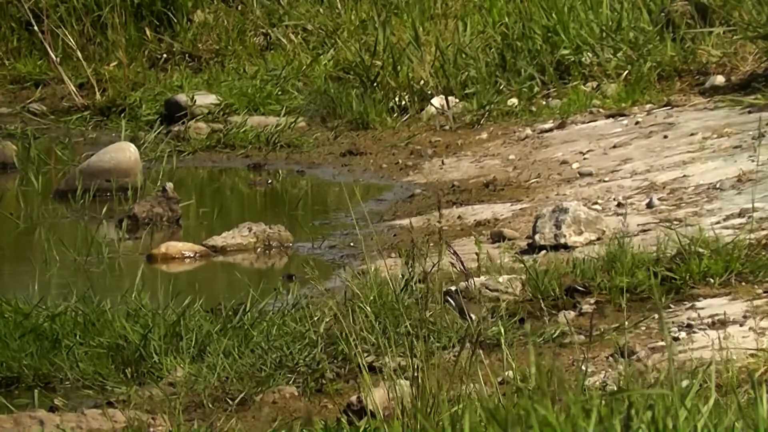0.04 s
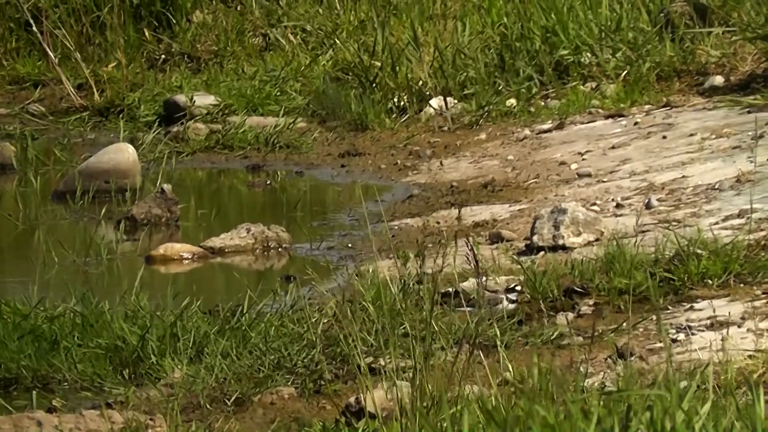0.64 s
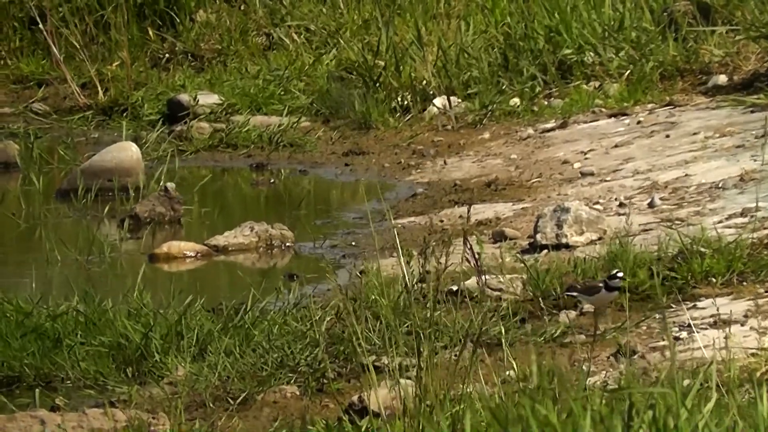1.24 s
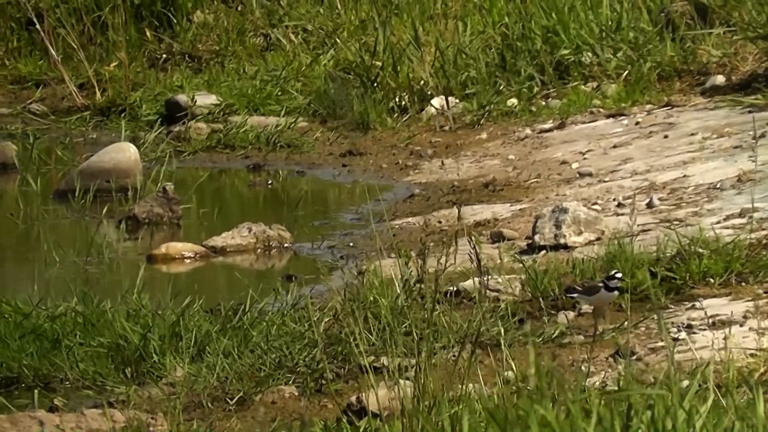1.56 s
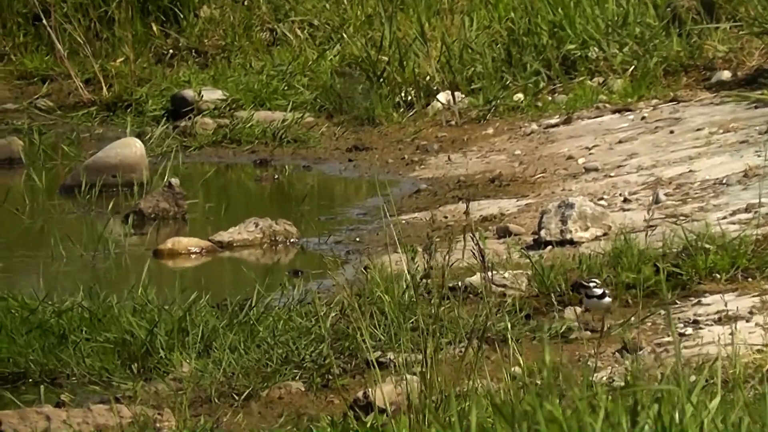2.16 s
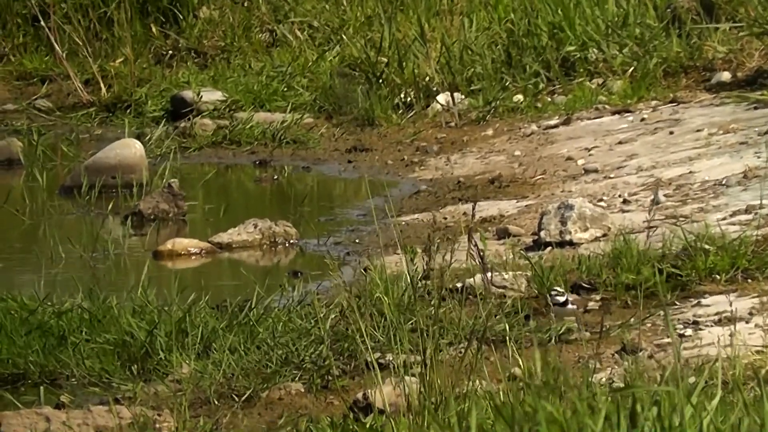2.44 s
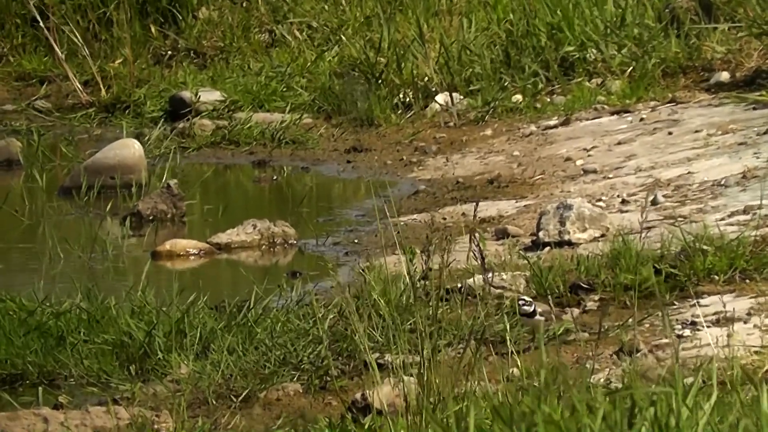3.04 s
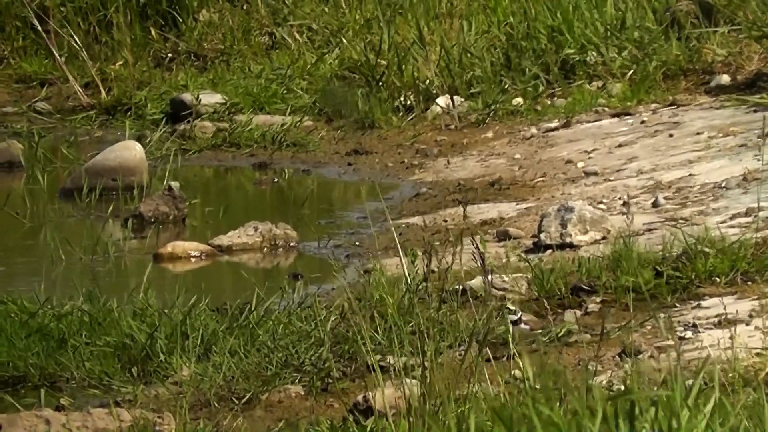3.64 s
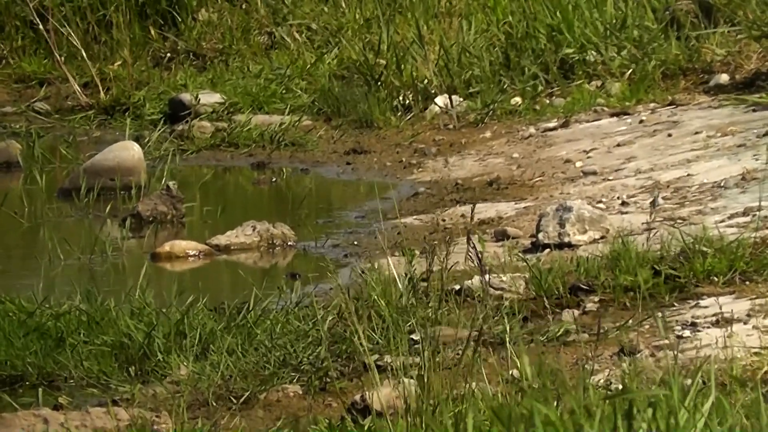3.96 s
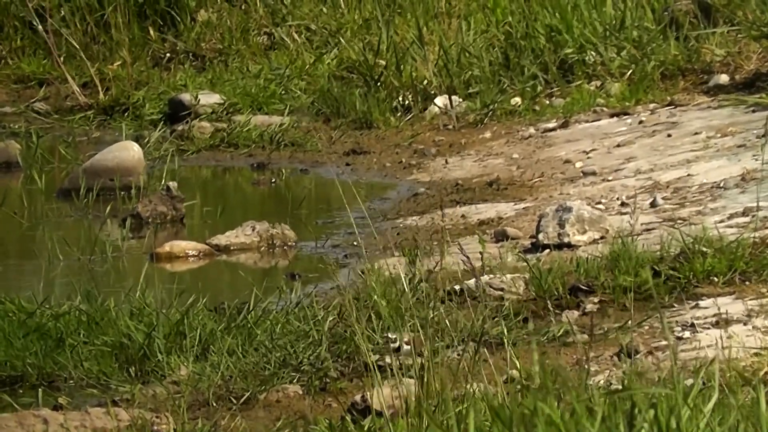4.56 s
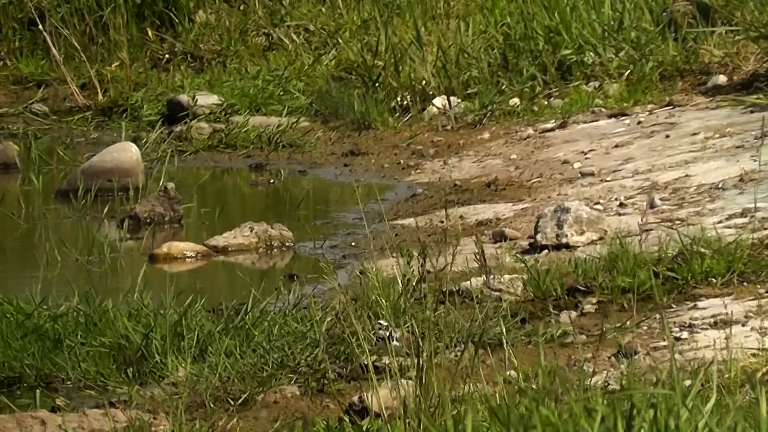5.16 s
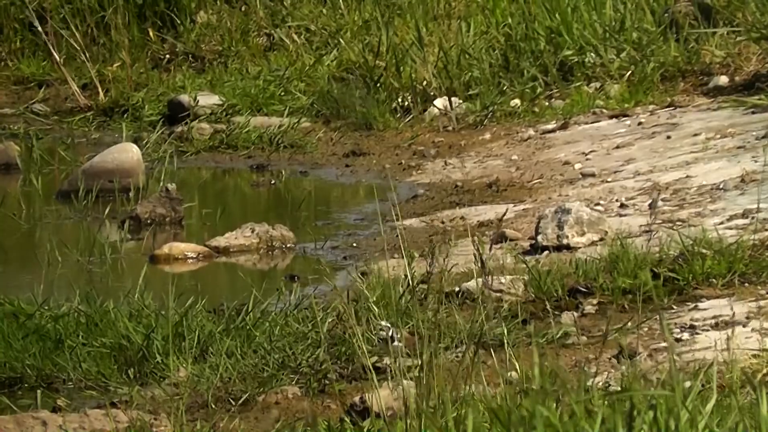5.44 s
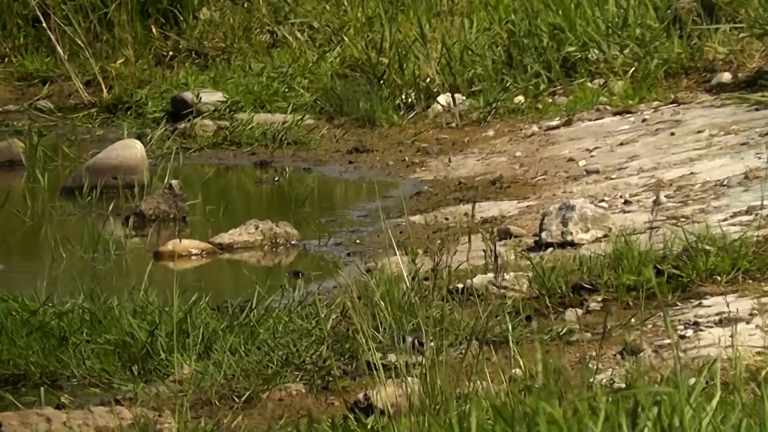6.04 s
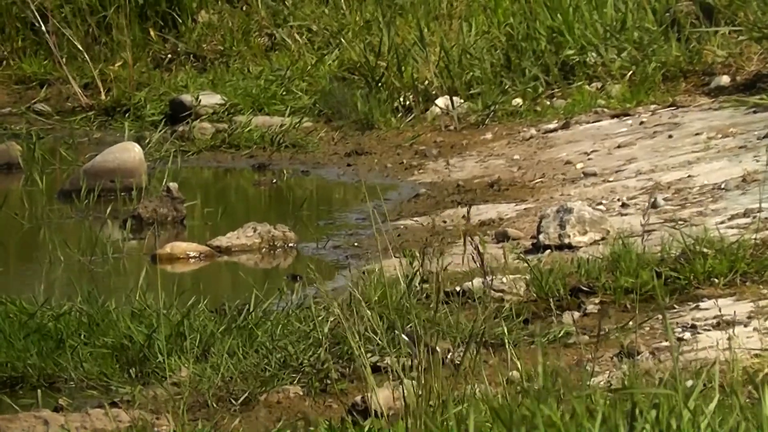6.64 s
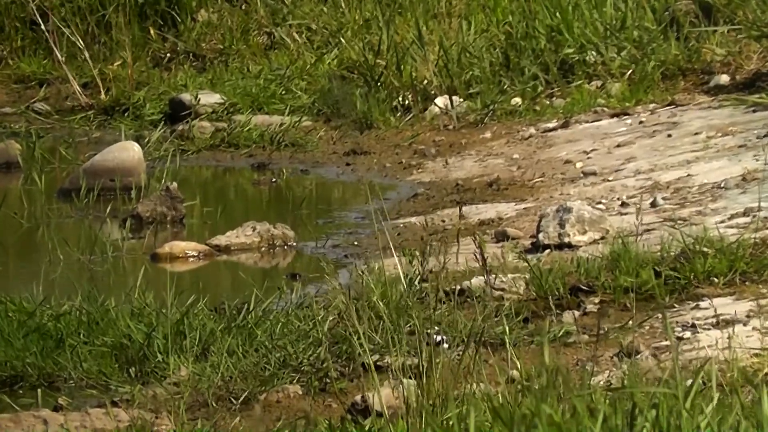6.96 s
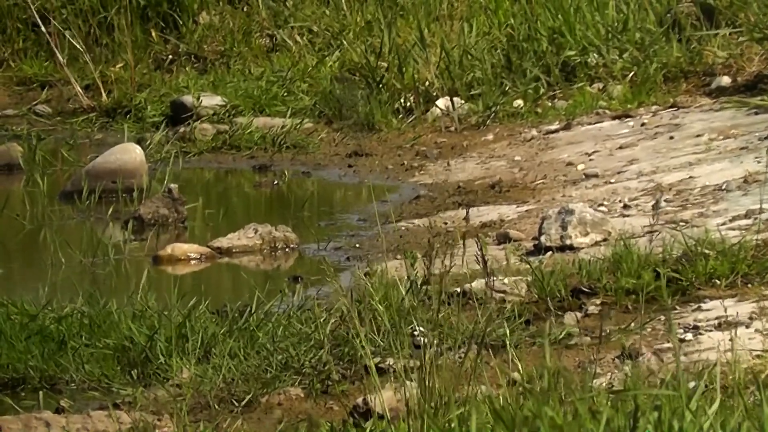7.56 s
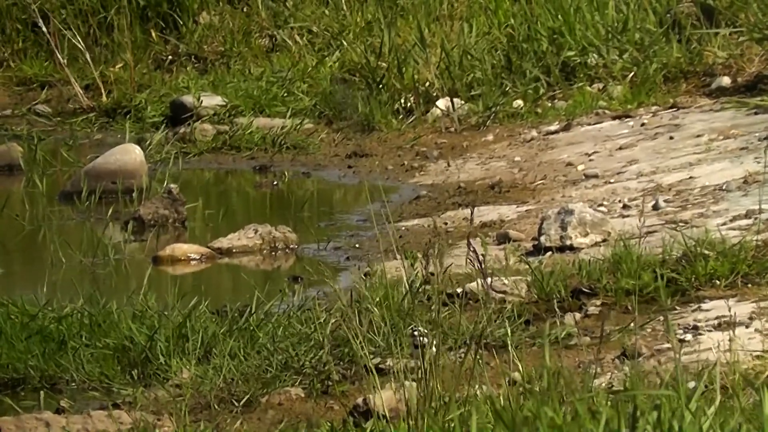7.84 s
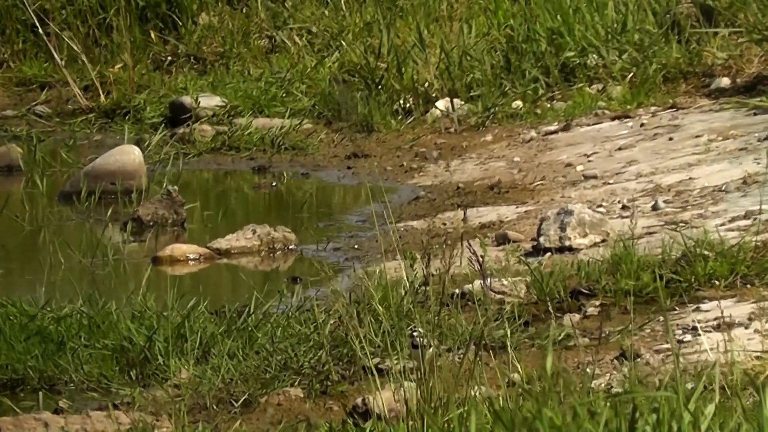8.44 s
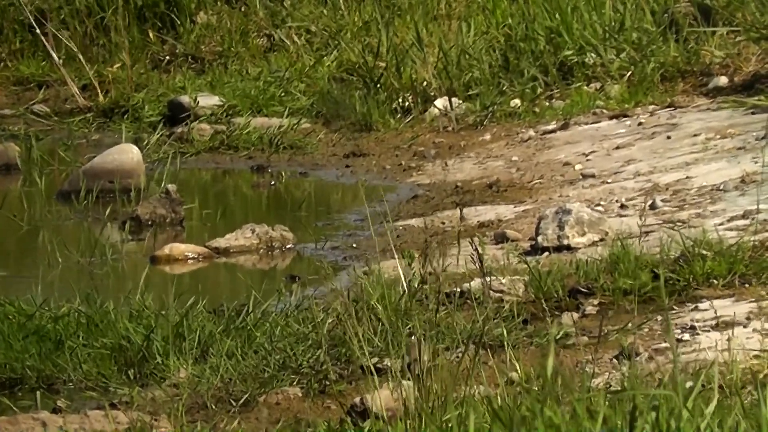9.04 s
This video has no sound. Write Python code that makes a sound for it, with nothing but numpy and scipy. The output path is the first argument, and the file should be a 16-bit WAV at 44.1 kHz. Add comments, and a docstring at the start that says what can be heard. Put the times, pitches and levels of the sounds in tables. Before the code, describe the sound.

Small birds zip, trill and whistle outdoors, with faint crickets behind them and uneven gusts of wind rumbling on the microphone.

```python
"""Small birds whistle, zip, trill and twitter in the grass round a pool, a little right of the camera,
each note a gliding tone. Two field crickets, one close and one farther back, chirp with quick wing
strokes in front of a distant chorus. Wind eddies buffet the camera's stereo microphone with low
thumps, over a soft outdoor hiss and the faint whine of the camera itself."""
import sys
import numpy as np
from scipy import signal
from scipy.fft import rfft, irfft
from scipy.io import wavfile
from scipy.ndimage import uniform_filter1d

SR = 44100
rng = np.random.default_rng(int(sys.argv[2]) if len(sys.argv) > 2 else 0)


def output_pcm(signal):
    """Save a mono or channel-first signal as 16-bit PCM at the path in sys.argv[1].

    Samples are clipped to [-1, 1] before scaling.
    """
    pcm = np.clip(np.atleast_2d(signal).T, -1, 1) * 32767
    wavfile.write(sys.argv[1], SR, np.round(pcm).astype(np.int16))


N = 410571
T = np.arange(N) / SR
FREQ = np.maximum(np.arange(N // 2 + 1) * SR / N, 1)

# light breeze between gusts: (time [s], level [dB])
BREEZE = [(0, -61), (.38, -57), (.5, -45), (2.0, -45.5), (2.85, -55.5), (3.3, -50), (4.4, -56.5),
          (5.4, -53.5), (5.75, -62.5), (6.3, -56.5), (7.0, -63), (7.5, -60.5), (8.65, -63), (9.3, -53.5)]
# gusts on the microphone: (start [s], hold [s], level [dB])
GUSTS = [(0.47, 0.087, -36.5), (0.598, 0.06, -41.5), (0.684, 0.129, -33), (0.823, 0.075, -38),
         (0.944, 0.11, -34.5), (1.09, 0.057, -33), (1.164, 0.213, -35.5), (1.472, 0.047, -35.5),
         (1.575, 0.5, -42.5), (1.639, 0.011, -35), (1.772, 0.2415, -36.5), (2.148, 0.097, -42.5),
         (2.329, 0.087, -39), (2.506, .14, -45), (3.012, 0.037, -38.5), (3.105, 0.049, -36.5),
         (3.18, 0.084, -43), (3.316, 0.011, -38.5), (3.573, 0.054, -39.5), (3.626, 0.29, -49.5),
         (4.031, 0.063, -39), (4.203, 0.029, -38), (4.429, 0.026, -42), (4.762, 0.024, -39.5),
         (4.841, 0.023, -41.5), (5.034, 0.0041, -40.5), (5.164, 0.0073, -43), (5.968, 0.08, -52.5),
         (6.183, 0.0083, -40), (6.563, 0.032, -46), (6.634, 0.037, -41), (7.096, 0.02, -48.5),
         (7.189, 0.403, -45.5), (7.378, 0.0078, -38.5), (8.797, .12, -51.5), (8.953, 0.35, -44.5),
         (9.125, 0.011, -40.5)]
# single eddies hitting head-on: (time [s], level [dB], half width [s])
BUFFETS = [(.524, -22.5, 0.001), (.674, -30, 0.00061), (1.015, -34, 0.00051), (1.259, -30.5, 0.00058),
           (1.640, -34, 0.00069), (3.010, -34.5, 0.00076), (.956, -26, 0.00066), (1.344, -28.5, 0.00066),
           (1.779, -29.5, 0.00057), (1.850, -32, 0.00038), (3.328, -29.5, 0.0014), (3.576, -24, 0.0011),
           (4.221, -31, 0.0011), (5.041, -38, 0.00092), (6.66, -35.5, 0.0016)]
# spectra of the wind and the outdoor hiss: (frequency [Hz], relative level [dB])
WIND_SPECTRUM = [(25, -21.5), (60, 0), (110, 7.5), (200, 2), (330, -11), (500, -26.5), (800, -42.5),
                 (1300, -59.5), (9000, -125)]
HISS_SPECTRUM = [(120, -23), (300, 3), (550, 0), (850, 2.5), (1100, -2), (1500, -8.5), (2200, -12.5),
                 (2800, -16.5), (3700, -15.5), (4700, -14.5), (6500, -17), (9000, -22.5), (15000, -29)]
# the camera's steady whines: (frequency [Hz], width [Hz], level [dB])
WHINES = [(1790, 58, -85), (2175, 110, -92), (7930, 35, -105)]
# spells of its thin high whine: (start [s], end [s])
THIN_WHINE_SPELLS = [(1.40, 2.954), (7.05, 8.60)]
# chirps of the close cricket: (last wing stroke [s], level [dB])
NEAR_CHIRPS = [(0.048, -67.5), (0.298, -68), (0.587, -67), (0.88, -68.5), (1.095, -69.5), (1.353, -71.5),
               (1.55, -71), (1.846, -71.5), (2.015, -71), (2.24, -66.5), (2.479, -62), (3.31, -65),
               (3.565, -72.5), (4.097, -65.5), (4.476, -69.5), (4.916, -68), (5.305, -68), (5.571, -64),
               (5.906, -64.5), (6.153, -67), (6.442, -64), (6.93, -67.5), (7.104, -66.5), (7.426, -70.5),
               (8.035, -66), (8.894, -71.5), (9.213, -74)]
# chirps of the farther cricket: (last wing stroke [s])
FAR_CHIRP_TIMES = [.14, .35, .925, 1.36, 1.61, 1.80, 2.19, 2.395, 2.60, 2.845, 3.01, 3.225, 3.445, 3.66,
                   3.81, 4.13, 4.34, 4.87, 5.06, 5.28, 5.52, 5.75, 5.96, 6.21, 6.65, 6.96, 7.46, 7.675,
                   7.89, 8.14, 8.365, 8.55, 8.78, 8.99, 9.18]
# notes of each bird figure:
# (delay [s], length [s], start pitch [Hz], middle pitch [Hz], end pitch [Hz], relative level [dB])
TICK_NOTES = [(-.014, 0.01, 5600, 6000, 5500, -22), (-.004, 0.0055, 4600, 5150, 5730, -10.5),
              (.001, 0.0047, 4900, 4360, 3900, -10)]
TWITTER_NOTES = [(.0168 * k, .008, 2700 + 130 * k, 2950 + 130 * k, 3250 + 130 * k, 0) for k in range(4)]
ZIP_NOTES = [(-.069, 0.0051, 3300, 4460, 4900, -9), (-.060, 0.0085, 3250, 3840, 4430, -13),
             (-.040, 0.0037, 2600, 2830, 2820, -14.5), (-.030, 0.0034, 2700, 2940, 3050, -16.5),
             (-.020, 0.0054, 3200, 3770, 4300, -12.5)]
TRILL_NOTES = [(-.004, 0.0088, 2570, 2730, 2600, 0.1),
               (.008, 0.01, 2440, 2630, 2550, 1)] + [(.046 + .0317 * k, .016, 1950, 2290, 2060, -2.5) for k in range(5)] + [(0.026 + 0.035 * k, .010, 2850, 3050, 3200, -9) for k in range(5)]
CHIT_NOTES = [(-.006, 0.0098, 2590, 4260, 2860, 1), (.005, 0.0032, 3000, 2950, 2900, 0.5),
              (.010, .007, 3600, 2800, 2200, -7)]
TSIT_NOTES = [(-.005, 0.0079, 2820, 4440, 5600, 2), (.020, 0.012, 5740, 6020, 5700, -4.5),
              (.030, .005, 5700, 4300, 3000, 1)]
# when each figure is sung: (time [s], level [dB])
TICKS = [(0.021, -55), (0.211, -56), (2.945, -59)]
ZIPS = [(4.111, -49.5), (4.545, -47), (4.743, -50.5), (5.188, -49), (5.389, -56.5)]
TRILLS = [(4.247, -65), (4.877, -68)]
CHITS = [(5.518, -64.5), (5.59, -71), (5.662, -72), (5.734, -70), (5.806, -67.5), (5.876, -66.5),
         (5.95, -66)]
TSITS = [(6.032, -63), (6.112, -67)]
# deep arched calls round a phrase: (top time [s], rise [s], top pitch [Hz], depth [Hz], level [dB])
DEEP_ARCHES = [(0.136, 0.034, 3820, 856, -64.5), (0.328, 0.04, 3760, 880, -64),
               (1.569, .05, 4290, 868, -65.5)]
# the run of shallow arches between them: (level [dB])
RUN_LEVELS = [-68.5, -70, -70, -70, -70, -72, -69, -75]
# distant whistles:
# (turn [s], lead [s], tail [s], start pitch [Hz], turn pitch [Hz], end pitch [Hz], level [dB])
WHISTLES = [(.377, .11, .15, 2035, 2250, 1900, -72), (.447, .03, .03, 3230, 2990, 2900, -73),
            (.671, .035, .09, 2460, 2305, 2230, -73), (1.54, .025, .025, 2200, 2220, 2200, -73),
            (1.70, .035, .09, 1970, 2100, 2010, -70), (1.95, .30, .2, 2950, 3280, 3200, -84),
            (2.16, .045, .04, 2900, 3400, 3200, -80), (3.28, .09, .18, 2150, 2100, 1980, -80),
            (3.47, .09, .13, 2780, 2840, 2480, -80), (4.66, .02, .04, 2450, 2500, 2200, -74),
            (6.29, .085, .36, 2380, 4280, 3560, -78.5), (6.30, .09, .32, 1700, 2860, 2520, -82),
            (6.50, .04, .11, 5170, 5130, 4800, -83), (6.70, .065, .03, 4050, 3420, 3370, -79),
            (6.787, .09, .025, 4540, 5100, 5000, -79), (6.875, .025, .04, 2520, 2590, 2760, -76),
            (6.93, .03, .06, 2700, 2810, 2720, -85), (6.94, .10, .025, 4700, 5150, 4940, -77),
            (7.097, .10, .015, 4730, 5200, 4950, -73), (7.155, .045, .035, 3380, 3080, 3130, -77),
            (7.46, .03, .03, 3260, 3060, 3230, -81), (7.98, .07, .08, 1270, 1255, 1225, -78),
            (8.615, .015, .009, 5550, 5680, 5550, -75), (8.708, .013, .008, 5450, 5690, 5550, -76)]
# bird buzzes:
# (start [s], end [s], centre [Hz], glide [Hz], pulse half sweep [Hz], pulse rate [1/s], level [dB])
BUZZES = [(2.431, 3.06, 4310, 102, 447, 77, -75), (3.215, 3.287, 4200, -200, 1000, 95, -74),
          (5.41, 5.48, 5500, -500, 500, 165, -81), (7.142, 7.17, 3940, -800, 700, 190, -73),
          (7.181, 7.289, 4900, 300, 500, 220, -74.5), (7.365, 7.383, 5250, -150, 400, 155, -74),
          (8.968, 9.05, 3080, 50, 150, 110, -80), (9.124, 9.166, 5170, -700, 500, 200, -80)]
# course of a bird's falling rattle: (time [s], centre [Hz], pulse length [s], level [dB])
RATTLE = [(3.659, 3500, 0.0093, -67), (3.686, 2750, 0.012, -71), (3.73, 2800, 0.0084, -68),
          (3.80, 3010, 0.0043, -66), (3.982, 2360, .005, -74)]


def undb(db):
    """Decibels to gain."""
    return 10 ** (np.asarray(db) / 20)


def unit(x):
    """Scale to rms 1."""
    return x / np.sqrt(np.mean(x ** 2))


def noise(gain):
    """Noise of rms 1 with the given gain at each frequency."""
    return unit(irfft(rfft(rng.standard_normal(N)) * gain, N))


def colour(points):
    """Gain at each frequency from (frequency [Hz], level [dB]) points."""
    hz, db = np.transpose(points)
    return undb(np.interp(np.log(FREQ), np.log(hz), db))


def walk(rate_hz):
    """Smooth random wandering with a spread of 1."""
    return noise(np.exp(-(FREQ / rate_hz) ** 2))


def pan(x, left_db):
    """Place a sound by its left minus right level."""
    return x * undb(np.array([[left_db], [-left_db]]) / 2)


def add(track, start, sound):
    """Mix a sound into a track at a time in seconds."""
    i = np.arange(len(sound)) + int(start * SR)
    inside = (i >= 0) & (i < N)
    track[i[inside]] += sound[inside]


def wind_strength(attack_s=.0071, release_s=.013, sway_db=3.5):
    """Wind level in dB: each gust rises fast, holds and dies away over a swaying breeze."""
    power = undb(np.interp(T, *np.transpose(BREEZE)) + sway_db * walk(17.7)) ** 2
    for start, hold, db in GUSTS:
        t = np.arange(-.05, hold + .2, 1 / SR)
        envelope = np.exp(np.minimum(t, 0) / attack_s - np.maximum(t - hold, 0) / release_s)
        add(power, start - .05, (undb(db) * envelope) ** 2)
    return 10 * np.log10(power)


def churn(gain, turnover_s=.055):
    """Turbulence: noise whose strength stays even over longer than an eddy's turnover."""
    x = noise(gain)
    return x / np.sqrt(uniform_filter1d(x ** 2, int(turnover_s * SR)) + 1e-9)


def wind(small_eddy_hz=380, crackle_db=2):
    """Eddies thump the microphone; harder gusts shed smaller ones that push its ports in opposition."""
    gust_db = wind_strength()
    hardness_db = gust_db + 38
    edge_fade = np.minimum(np.minimum(T, T[::-1]) / .01, 1)
    gust = edge_fade * undb(gust_db - 2 + 1.2 * walk(30))
    spectrum = colour(WIND_SPECTRUM)
    small_share = FREQ ** 2 / (FREQ ** 2 + small_eddy_hz ** 2)
    large, small = spectrum * (1 - small_share), spectrum * small_share
    large_gain = undb(-np.maximum(hardness_db, 0))
    small_gain = undb(.92 * hardness_db - 4 + crackle_db * walk(76))
    shared, left, right = (gust * (large_gain * churn(large) + small_gain * churn(small))
                           for _ in range(3))
    # an eddy hitting head-on is one short swing of pressure
    for middle, db, width in BUFFETS:
        u = np.arange(-10, 10, 1 / (width * SR))
        add(shared, middle - 10 * width, undb(db) * (1 - u ** 2) * np.exp(-u ** 2 / 2))
    phase_gap = np.interp(FREQ, [30, 110, 380, 700], [.4, .8, 2.1, 2.65])
    left_db = np.interp(FREQ, [110, 380, 900], [1.7, -5.5, -2])
    ports = undb(np.array([left_db, -left_db]) / 2) * np.exp(.5j * np.array([phase_gap, -phase_gap]))
    ports /= np.abs(ports.mean(axis=0))
    return irfft(rfft(shared) * ports, N) + undb(-8) * np.array([left, right])


def outdoor_hiss(db=-72.5):
    """Steady distant hiss, wide in the middle range and narrower in the treble."""
    spectrum = unit(colour(HISS_SPECTRUM))
    width = colour([(100, -10), (400, -8.5), (1300, -.5), (2400, -1.5),
                    (4400, -18.5), (8000, -9), (15000, -2.5)])
    mid, side = (irfft(rfft(rng.standard_normal(N)) * spectrum * w, N) for w in (1, width))
    return np.array([mid + side, mid - side]) * undb(db)


def whine(hz, width_hz):
    """Noise through a steep resonance."""
    return noise(1 / (1 + ((FREQ - hz) / (width_hz * .75)) ** 2))


def camera_whine(tone_hz=12500):
    """The camera whines faintly; a thin high band switches on twice with a soft whirr under it."""
    steady = sum(undb(db) * whine(hz, width) for hz, width, db in WHINES)
    tone = undb(-102.5) * np.sin(2 * np.pi * tone_hz * T)
    gate = sum((T > start) & (T < end) for start, end in THIN_WHINE_SPELLS)
    thin = undb(-94) * np.array([whine(11650, 380) for _ in range(2)])
    whirr = undb(-88) * whine(2230, 260)
    return steady + tone + gate * (thin + whirr)


def wing_stroke(length, hz, sag):
    """One stroke rises onto the pitch of the wing's harp, swells, then sags as the wing slows."""
    u = np.linspace(0, 1, int(length * SR))
    pitch = hz * (1 - sag * (u ** 5 + .6 * (1 - u) ** 3))
    swell = np.sin(np.pi * u ** 1.1) ** .85
    return swell * np.sin(2 * np.pi * np.cumsum(pitch) / SR)


def cricket(chirps, hz, stroke_s, gap_s, fade_db, sag=.1):
    """The four wing strokes of a chirp grow longer, higher and louder, each a little different."""
    out = np.zeros(N)
    for last, db in chirps:
        for k in range(4):  # counted back from the last stroke
            sharp, long, loud = rng.standard_normal(3)
            length = stroke_s * (1 - .1 * k + .1 * long)
            stroke = wing_stroke(length, hz * (1 - .012 * k + .005 * sharp), sag)
            gain = undb(db + fade_db * k ** 2 + (1 + k / 2) * loud)
            add(out, last - gap_s * k - len(stroke) / SR / 2, gain * stroke)
    return out


def cricket_chorus(db, count, centre_hz=4850, spread_hz=90):
    """More crickets far off in the meadow, each at its own pitch and pace."""
    out = 0
    for hz in centre_hz + spread_hz * np.linspace(-1, 1, count):
        times = np.cumsum(rng.uniform(.2, .4, size=48)) - .3
        chirps = np.column_stack([times, db + 2 * rng.standard_normal(len(times))])
        voice = cricket(chirps, hz, stroke_s=.019, gap_s=.036, fade_db=-.7)
        out = out + pan(voice, rng.normal(-2, 2))
    return out


def bird_note(length, first_hz, middle_hz, last_hz):
    """A short tone that bends through three pitches, swelling slowly and stopping sooner."""
    u = np.linspace(0, 1, int(length * SR))
    hz = np.polyval(np.polyfit([0, .5, 1], [first_hz, middle_hz, last_hz], 2), u)
    swell = np.abs(np.sin(np.pi * u ** 1.2)) ** .8
    return swell * np.sin(2 * np.pi * np.cumsum(hz) / SR)


def song(figure, times, scatter_db=1.8):
    """A bird repeats a figure of quick notes, never twice quite alike."""
    out = np.zeros(N)
    for start, db in times:
        for delay, length, *pitches, note_db in figure:
            sharp, loud = rng.standard_normal(2)
            note = bird_note(length, *np.array(pitches) * (1 + .015 * sharp))
            add(out, start + delay, undb(db + note_db + scatter_db * loud) * note)
    return out


def rasp(x):
    """A fast uneven flutter makes a pure note scratchy."""
    return x * undb(2.5 * walk(500) - .7)


def glide(turn_s, lead_s, tail_s, first_hz, turn_hz, last_hz):
    """A bird's tone glides to a turning pitch, where it is loudest, and glides away."""
    out = np.zeros(N)
    t = np.arange(-lead_s, tail_s, 1 / SR)
    away = np.abs(t / np.where(t < 0, lead_s, tail_s))
    bend = (np.sin(away) / np.sin(1)) ** 1.9
    hz = turn_hz + (np.where(t < 0, first_hz, last_hz) - turn_hz) * bend
    swell = (1 - .5 * away) * np.clip((1 - away) * 6, 0, 1)
    add(out, turn_s - lead_s, swell * np.sin(2 * np.pi * np.cumsum(hz) / SR))
    return out


def arched_calls(gap_s=.1305, climb_hz=45.1, upper_depth_hz=950):
    """A close bird's deep arches frame a slowing, climbing run with a rough voice a fifth above."""
    # columns as in DEEP_ARCHES
    run = [(.461 + gap_s * k + .001 * k ** 2, .049, 3640 + climb_hz * k, 423, db)
           for k, db in enumerate(RUN_LEVELS)]
    calls = sum(undb(db) * glide(top_s, rise, .7 * rise, hz - depth, hz, hz - 1.3 * depth)
                for top_s, rise, hz, depth, db in DEEP_ARCHES + run)
    upper = np.zeros(N)
    for top_s, rise, hz, _, _ in run:
        foot_hz = 1.5 * hz - upper_depth_hz
        upper += glide(top_s, 1.2 * rise, rise, foot_hz, 1.5 * hz, foot_hz)
    return calls * undb(2 * walk(90)) + upper * undb(-85 + 4 * walk(300))


def whistles(flutter_db=2.5):
    """Birds farther off whistle single notes that flutter in the moving air."""
    notes = sum(undb(db) * glide(*shape) for *shape, db in WHISTLES)
    return notes * undb(flutter_db * walk(90))


def twitter(start_s=2.21, pace_s=.113, db=-76):
    """A bird softly repeats four rising notes at an even pace."""
    return song(TWITTER_NOTES, [(start_s + pace_s * k, db) for k in range(7)])


def buzzes(pulse_s=.0075):
    """A bird's buzz is a gliding train of tiny downward sweeps, uneven in strength and spacing."""
    out = np.zeros(N)
    for start, end, centre, rise, sweep, rate, db in BUZZES:
        for t, (loud, late) in zip(np.arange(start, end, 1 / rate), rng.standard_normal((64, 2))):
            hz = centre + rise * ((t - start) / (end - start) - .5)
            pulse = bird_note(pulse_s, hz + sweep, hz, hz - sweep)
            add(out, t + late / rate / 10, undb(db + 2 * loud) * pulse)
    return out


def rattle(above_hz=950, below_hz=430, gap_s=.0092, slowing_s=.007, count=30):
    """A train of hooked downward sweeps slows, shortens and sinks as the bird runs out of push."""
    out = np.zeros(N)
    times, *controls = np.transpose(RATTLE)
    t = times[0]
    for k, loud in enumerate(rng.standard_normal(count)):
        hz, length, db = (np.interp(t, times, c) for c in controls)
        add(out, t, undb(db + loud) * bird_note(length, hz + above_hz, hz, hz - below_hz))
        t += gap_s + slowing_s * (k / count) ** 3
    return out


def zips(top_hz=5240, step_ratio=.862, gap_s=.0168, note_s=.0063, tilt=.031):
    """A close bird's rising notes end in a staircase of six falling ones, the last softer."""
    stairs = []
    for k, db in enumerate([-11.5] * 5 + [-18.5]):
        hz = top_hz * step_ratio ** k
        stairs.append((gap_s * k - .002, note_s, hz * (1 + tilt), hz, hz * (1 - tilt), db))
    return song(ZIP_NOTES + stairs, ZIPS)


def meadow(x, wet_db, t60_s=.22):
    """Grass, bank and trees scatter a faint tail back to the microphone."""
    t = T[:SR // 2]
    tails = rng.standard_normal((2, len(t))) * undb(-60 * t / t60_s)
    tails /= np.sqrt(np.sum(tails ** 2, axis=1, keepdims=True))
    # most of it comes from the birds' own direction, so both ports hear nearly the same tail
    tails = tails[0] + np.array([[.3], [-.3]]) * tails[1]
    return x + undb(wet_db) * signal.fftconvolve(x, tails, axes=1)[:, :N]


def scene():
    """Birds and crickets at three distances, a little to the right; wind and hiss all round."""
    near_birds = rasp(zips() + song(TRILL_NOTES, TRILLS) + song(TSIT_NOTES, TSITS)) + rattle()
    far_birds = rasp(twitter() + song(CHIT_NOTES, CHITS) + song(TICK_NOTES, TICKS)) + buzzes()
    near_cricket = cricket(NEAR_CHIRPS, hz=4332, stroke_s=.025, gap_s=.032, fade_db=-1, sag=.11)
    far_chirps = [(time, -75.5) for time in FAR_CHIRP_TIMES]
    far_cricket = cricket(far_chirps, hz=4586, stroke_s=.035, gap_s=.036, fade_db=-.68)
    close = meadow(pan(arched_calls() + near_birds + near_cricket, -4.5), wet_db=-13)
    deeper = meadow(pan(far_birds + far_cricket, -3.5) + cricket_chorus(db=-79.5, count=4), wet_db=-6)
    distant = meadow(pan(whistles(), -4), wet_db=-13, t60_s=.36)
    return close + deeper + distant + wind() + outdoor_hiss() + camera_whine()


def record(dry):
    """The camera cuts the treble steeply above 15650 Hz."""
    return signal.sosfilt(signal.ellip(10, .1, 70, 15650, fs=SR, output="sos"), dry)


dry = scene()
out = record(dry)
output_pcm(out)
```